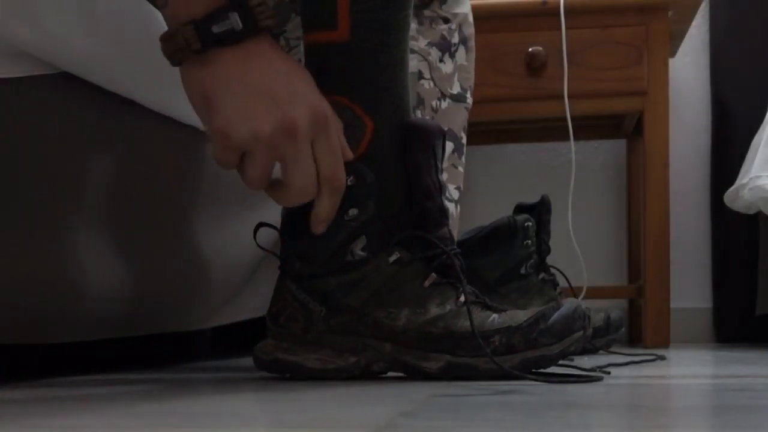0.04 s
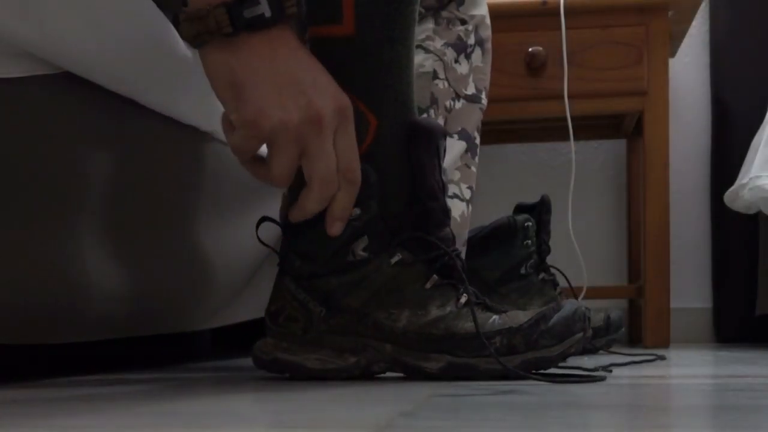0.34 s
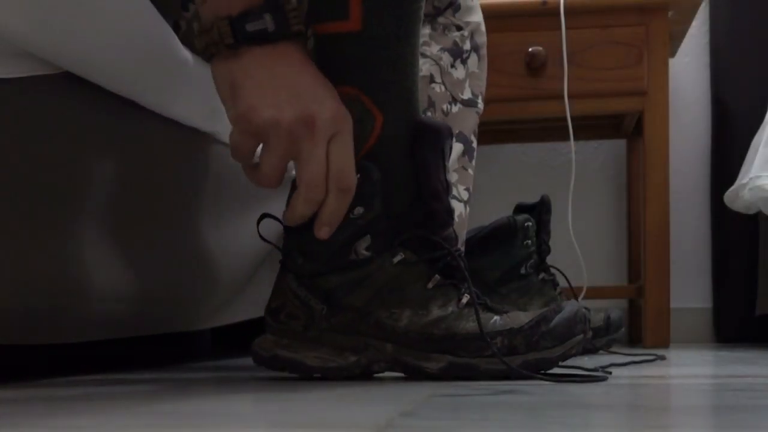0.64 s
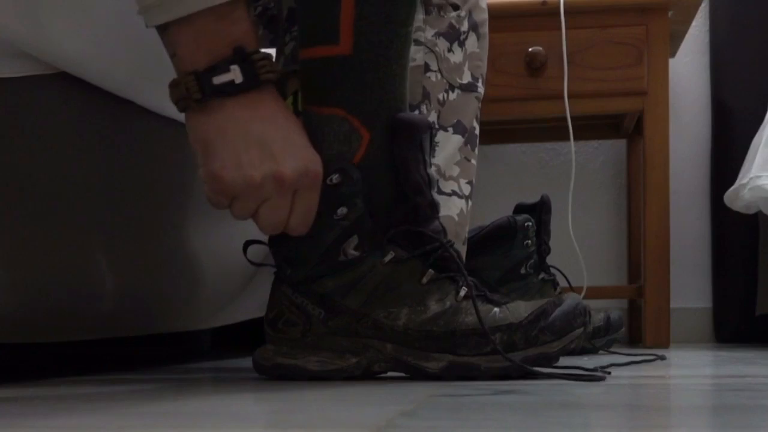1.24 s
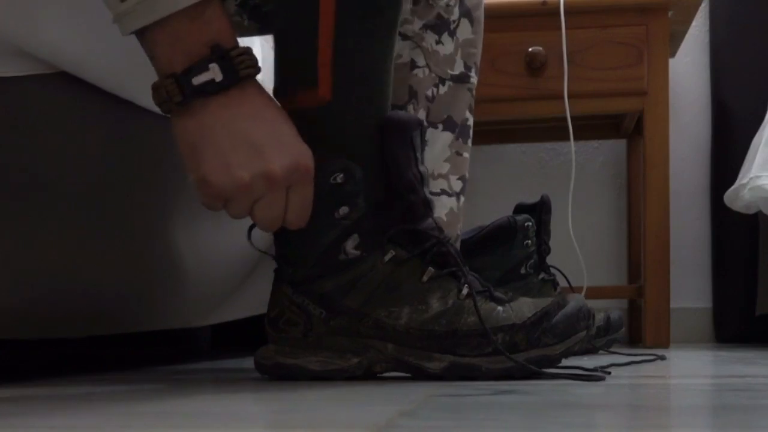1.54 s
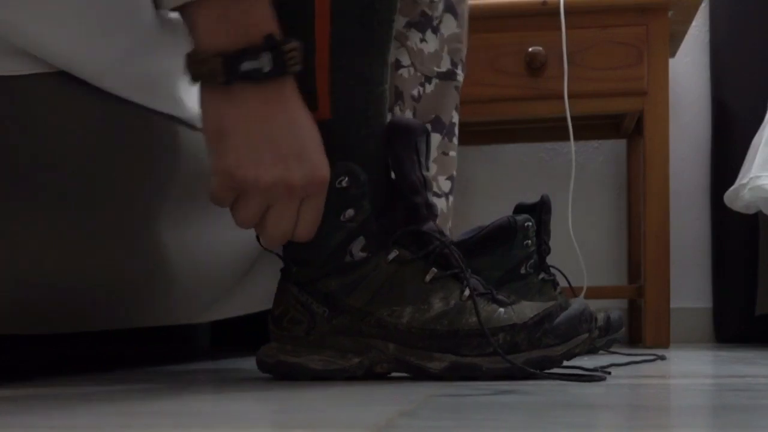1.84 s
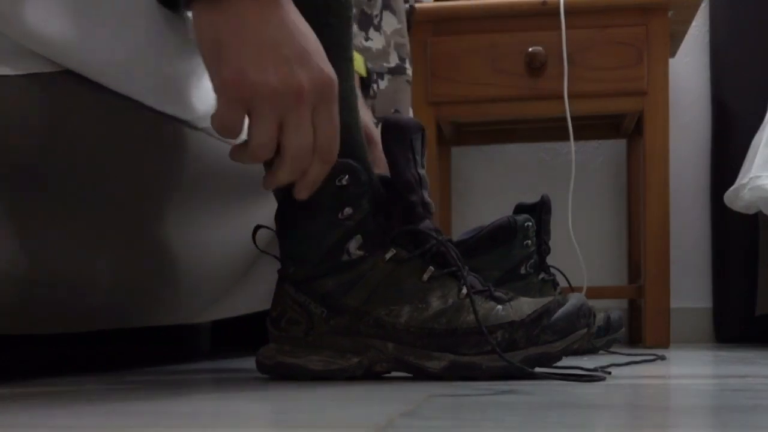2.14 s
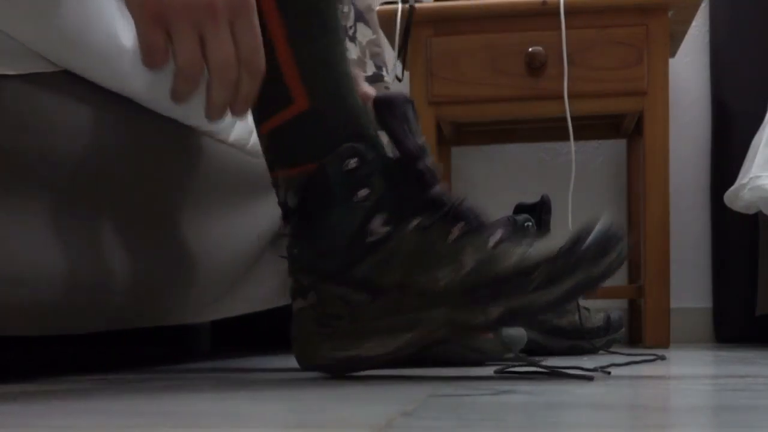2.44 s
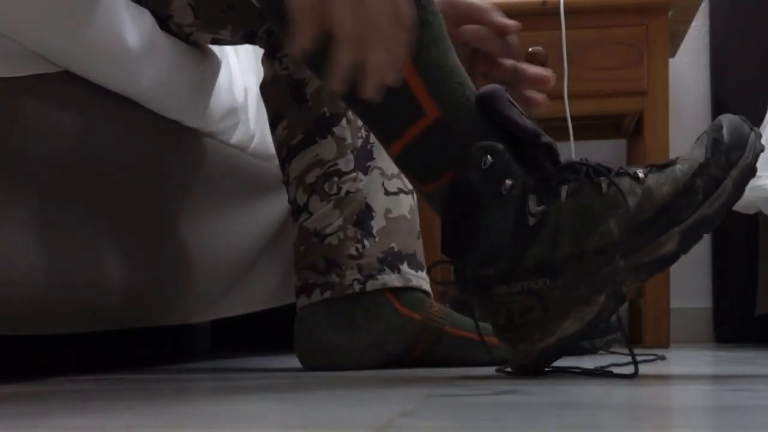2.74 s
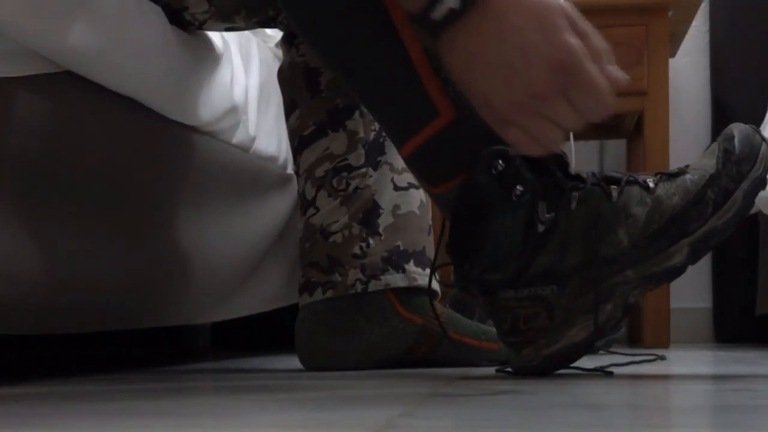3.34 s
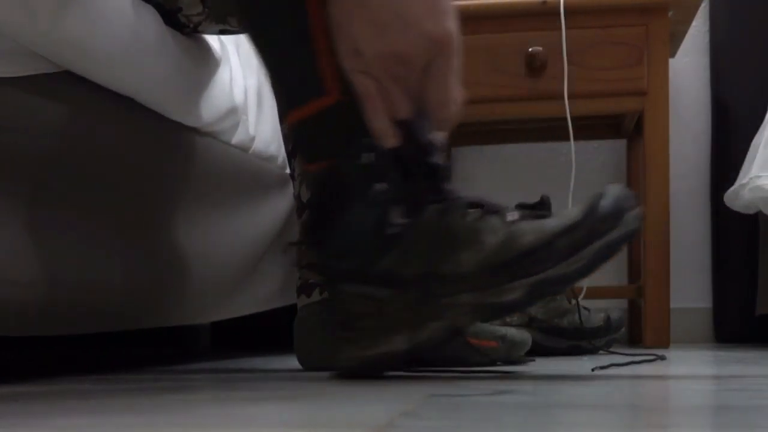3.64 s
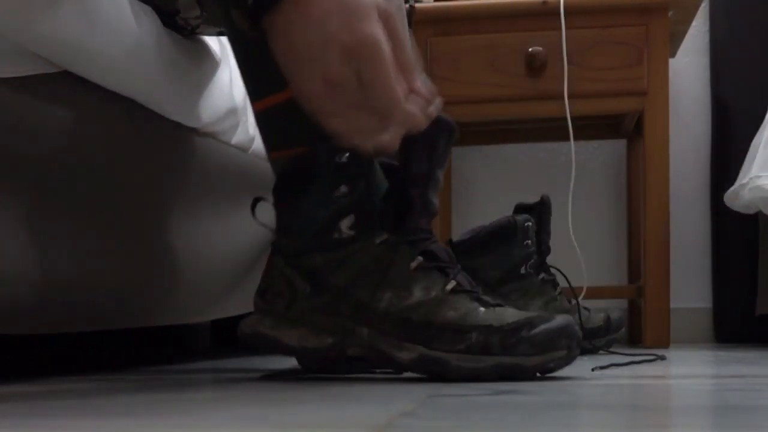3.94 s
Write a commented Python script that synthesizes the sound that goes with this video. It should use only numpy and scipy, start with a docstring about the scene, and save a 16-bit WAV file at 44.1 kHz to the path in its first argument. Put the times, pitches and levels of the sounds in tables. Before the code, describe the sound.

A boot is pulled on, heard close in a small bedroom, with soft clothing rustle and faint bumps throughout. At about 1.5 seconds the foot slides in with a swish, and the heel thuds home near 1.8. Trousers brush around 2.4. From 3 seconds come light taps and a brief hiss of a pulled lace. At 3.8 the sole smacks loudly on the hard floor, ringing briefly.

```python
"""A hiking boot is pulled on, handled and slapped down on the hard floor of a small bedroom.
Stick-slip friction of sock, trousers and hands makes the rustle; the foot slides in with a rush
and the heel thuds home. Impacts excite damped modes: dull thuds when padded, sharp taps when hard,
and a loud smack when the rubber sole lands flat. Floor and room ring on, and a close microphone
picks it all up over a faint hiss."""
import sys
import numpy as np
from scipy import signal
from scipy.fft import rfft, irfft
from scipy.io import wavfile

SR = 44100
rng = np.random.default_rng(int(sys.argv[2]) if len(sys.argv) > 2 else 0)


def pcm_store(signal):
    """Save signal as 16-bit PCM."""
    levels = np.round(np.clip(np.atleast_2d(signal), -1, 1) * 32767)
    wavfile.write(sys.argv[1], SR, levels.astype(np.int16).T)


N = 176400
T = np.arange(N) / SR
HZ = np.maximum(np.fft.rfftfreq(N, 1 / SR), 1)
SLAP_S, SLAP_DB = 3.8176, -4.5   # the blow that drives both sole and floor

# Likeness of left and right. Each row: frequency in Hz, correlation.
COHERENCE = [(180, .999), (500, 0.93), (1500, 0.84), (4000, 0.61), (8000, 0.61), (14000, 0.73)]
# First reflections. Each row: delay in seconds, gain in dB.
REFLECTIONS = [(.0049, -7.5), (0.0127, -20.5), (0.0134, -7.5), (.018, -10), (.044, -13)]
# Diffuse reverberation. Each row: frequency in Hz, T60 in seconds, gain in dB.
REVERBERATION = [(80, 0.67, 0.5), (208, 0.57, 4), (600, 0.29, 1.5), (1480, 0.34, 0), (3600, 0.49, -1),
                 (9400, 0.24, -0.5)]

# Damped modes. Each row: frequency in Hz, gain in dB, T60 in seconds.
WALL_MODES = [(84.2, -63, 0.92), (109.3, -56.5, 0.82), (169, -60.5, 1)]
FLOOR_MODES = [(111, -43.5, .6), (164, -36, .3), (277.4, -30, 0.42), (343.6, -38, 0.42), (529, -36.5, 0.52),
               (990, -32, 0.36), (1229, -23, 0.23), (1350, -26, .28), (1375, -30, 0.55), (1443, -28, 0.43),
               (1680, -29, 0.35), (1760, -27, .25), (1858, -25.5, 0.3), (1952, -24, 0.22)]
COLLAR_MODES = [(948, -20, 0.0038), (1900, -18.5, 0.0022), (2950, -18.5, 0.0031)]
SOLE_MODES = [(178, -22.5, .04), (325, -13.5, 0.012), (500, -17.5, .015), (970, -10.5, 0.0079),
              (1370, 0, 0.0077), (1820, -15.5, 0.015), (3760, -12, .004)]

# Noise spectra. Each row: frequency in Hz, relative spectral density in dB.
HISS_SPECTRUM = [(30, -20), (150, -6.5), (400, -4.5), (900, 1), (1500, 4.5), (4000, -6), (13000, -10),
                 (16000, -22)]
CLOTHES_SPECTRUM = [(300, -33), (1500, -8), (3000, 0), (6000, 0.5), (9000, -1.5), (12500, -1), (14500, -5),
                    (16000, -10.5)]
RUB_SPECTRUM = [(200, -40), (600, -21), (1000, -3), (1450, -0.5), (2100, -3), (2800, -5), (4000, -10),
                (7000, -32)]
HAND_SPECTRUM = [(50, -36), (160, -22.5), (300, -7.5), (450, -1), (620, -0.5), (800, 3), (1100, -4),
                 (1800, -20.5)]
LACE_SPECTRUM = [(400, -45), (1200, -39), (2200, 3), (4000, -24), (7000, -3.5), (10000, -1), (13000, -3),
                 (16000, -6)]
TROUSER_SPECTRUM = [(1000, -22), (1400, 0), (1700, 0), (2100, -15), (4200, -9), (4800, -1), (5600, -21),
                    (9000, -35)]
CHAFE_SPECTRUM = [(500, -40), (1150, -12), (1530, 5), (1900, -3), (2300, -7), (2750, 2.5), (3500, -28)]
SLIDE_SPECTRUM = [(90, -30), (220, -8.5), (450, -0.5), (850, -8), (1200, 3.5), (1800, 2), (2700, 0),
                  (4500, -6), (9000, -23)]
CAVITY_SPECTRUM = [(400, -27.5), (700, -2), (880, -1.5), (1100, -1), (1500, -11), (2500, -27)]
GRIT_SPECTRUM = [(1500, 2), (3500, 9.5), (6000, -1), (12000, -4.5), (16000, -16)]

# Envelopes of friction. Each row: time in seconds, relative level in dB.
CLOTHES_ENVELOPE = [(0.0, -57.5), (0.21, -62.5), (0.33, -56), (0.52, -71), (0.72, -60), (0.74, -54.5),
                    (0.97, -64), (1.08, -54), (1.27, -54), (1.46, -50.5), (1.55, -41.5), (1.66, -55.5),
                    (1.73, -61), (1.85, -48.5), (2.17, -60), (2.42, -54), (2.63, -63), (2.78, -63.5),
                    (2.81, -57.5), (2.89, -59), (2.92, -55), (3.31, -62.5), (3.33, -56.5), (3.49, -59),
                    (3.51, -54.5), (3.63, -51), (3.7, -53), (3.8, -49.5), (3.9, -67), (3.91, -65),
                    (4.0, -51)]
RUB_ENVELOPE = [(0.0, -58.5), (0.362, -59), (0.452, -68), (0.678, -78), (0.686, -59), (0.888, -60.5),
                (0.988, -68), (0.996, -62), (1.016, -59), (1.45, -51), (1.72, -66.5), (1.828, -47.5),
                (1.88, -49.5), (2.04, -55), (2.052, -59.5), (2.406, -56), (2.892, -64.5), (2.898, -64),
                (2.944, -57.5), (3.138, -53.5), (3.24, -60), (3.4, -56.5), (3.63, -54)]
HAND_ENVELOPE = [(0.0, -65), (0.19, -67.5), (0.51, -73), (0.92, -73), (1.05, -69), (1.45, -55), (1.65, -66),
                 (1.76, -67), (1.9, -56), (2.36, -60), (2.67, -71), (2.91, -62.5), (3.22, -53.5),
                 (3.34, -53.5), (3.48, -52.5), (3.72, -70), (3.79, -54)]

# Padded blows of foot and hand on the boot. Each row: start in seconds, impulse level in dB,
# pitch in Hz, bass frequency in Hz, relative bass level in dB.
THUDS = [(0.035, -40.5, 517, 110, -12), (.053, -54.5, 480, 246, 10.5), (0.2788, -36.5, 543, 207, 2),
         (0.997, -45.5, 373, 155, -10), (1.626, -49.5, 400, 160, 8), (1.68, -37.5, 352, 170, -29),
         (1.782, -36.5, 480, 200, -24), (1.8082, -28, 620, 180, -3), (1.834, -35, 283, 160, -11),
         (2.405, -41, 466, 171, -31), (2.561, -39, 300, 150, -16.5), (3.653, -39, 486, 203, -5.5)]
# Hard contacts of heel and laces. Each row: start in seconds, impulse level in dB, pitch in Hz,
# T60 in cycles, second resonance in Hz, its relative level in dB, left over right in dB.
TAPS = [(.995, -35, 1237, 9.7, 900, -13, 1), (3.033, -38, 800, 12.4, 517, -5, 0),
        (3.2677, -34, 1900, 5, 1007, 2, -1), (3.2762, -22, 1922, 7.8, 1210, -5.5, -2.5),
        (3.3265, -20.5, 1190, 11.8, 600, -11, -2), (3.547, -32.5, 2200, 11, 1200, -12, 0),
        (3.652, -18, 1086, 6.1, 500, -31, 6), (3.772, -32, 1000, 8.3, 2800, -3, 0),
        (3.8101, -23.5, 1100, 3.7, 2500, -10, 0)]


def from_db(db):
    """Amplitude grows tenfold for every 20 dB."""
    return 10 ** (np.asarray(db) / 20)


def unit_rms(x):
    """Division by the rms gives a signal unit power."""
    return x / np.sqrt(np.mean(x ** 2) + 1e-20)


def in_time(envelope):
    """Linear interpolation gives an envelope's level at every sample."""
    return np.interp(T, *np.transpose(envelope))


def at_hz(rows, hz):
    """Interpolation in log frequency gives each column of a table at hz."""
    frequencies, *columns = np.transpose(rows)
    return [np.interp(np.log(hz), np.log(frequencies), column) for column in columns]


def soften(x, hz):
    """A low-pass filter removes fast changes, as a soft contact does."""
    return signal.sosfilt(signal.butter(4, min(hz, .45 * SR), fs=SR, output="sos"), x + 1e-18)


def thin(x, hz):
    """A high-pass filter takes 12 dB per octave from the bass."""
    return signal.sosfilt(signal.butter(2, hz, "high", fs=SR, output="sos"), x)


def impulse(start_s, db=0):
    """An ideal impulse excites all frequencies equally."""
    return (np.arange(N) == int(start_s * SR)) * from_db(db)


def ring(x, hz, t60):
    """A damped resonator answers a unit impulse with a unit sine that falls 60 dB in t60 seconds."""
    decay = from_db(-60 / (t60 * SR))
    angle = 2 * np.pi * hz / SR
    return signal.lfilter([0, np.sin(angle)], [1, -2 * decay * np.cos(angle), decay ** 2], x + 1e-18)


def radiate(x, hz, t60):
    """A small vibrating patch radiates the derivative of its ringing, so little below its pitch."""
    return np.diff(ring(x, hz, t60), prepend=0) * SR / (2 * np.pi * hz)


def stereo(pair, gain):
    """Partial coherence: two independent noises mix into channels most alike in the bass."""
    alike = at_hz(COHERENCE, HZ)[0]
    mid, side = rfft(pair) * gain
    return irfft(np.sqrt(1 + alike) * mid + np.sqrt(1 - alike) * side * [[1], [-1]], N)


def hiss(level_db=-64):
    """The noise floor of room and microphone is steady, coloured Gaussian noise."""
    colour = from_db(at_hz(HISS_SPECTRUM, HZ)[0])
    return from_db(level_db) * unit_rms(stereo(rng.standard_normal((2, N)), colour))


def room_response(build_s=0.006):
    """Reflections from floor and furniture precede an exponential tail, longest in the bass."""
    noise = rfft(stereo(rng.standard_normal((2, N)), np.sqrt(.5)))
    edges = np.geomspace(25, SR / 2, 15)
    tail = 0
    for low, high in zip(edges, edges[1:]):
        t60, db = at_hz(REVERBERATION, np.sqrt(low * high))
        envelope = from_db(-60 * T / t60) * (1 - np.exp(-T / build_s))
        band = irfft(noise * (HZ >= low) * (HZ < high), N) * envelope
        energy_share = 2 * (high - low) / SR   # of a unit impulse, within this band
        tail = tail + from_db(db) * unit_rms(band) * np.sqrt(energy_share / N)
    early = sum(impulse(delay_s, db) for delay_s, db in REFLECTIONS)
    return (early + tail)[:, :SR]


def standing_waves(drive):
    """Sound reflected between the walls resonates at a few low frequencies."""
    return sum(from_db(db) * ring(drive, hz, t60) for hz, db, t60 in WALL_MODES)


def floor_ring():
    """Modes of floor and room, alternating in sign, decay freely after the slap."""
    blow = impulse(SLAP_S, SLAP_DB)
    return sum((-1) ** k * from_db(db) * ring(blow, hz, t60)
               for k, (hz, db, t60) in enumerate(FLOOR_MODES))


def friction(spectrum, level_db, slips_per_s=2500, spread_db=3, smooth_share=0.77, flutter_db=1.0):
    """Stick-slip friction: fibres catch and let go, as snaps in a smooth hiss under uneven pressure."""
    sizes = from_db(spread_db * np.minimum(rng.exponential(1, (2, N)), 5))
    signs = rng.choice([-1, 1], (2, N))
    slips = unit_rms(sizes * signs * (rng.random((2, N)) < slips_per_s / SR))
    fibres = np.sqrt(1 - smooth_share) * slips + np.sqrt(smooth_share) * rng.standard_normal((2, N))
    pressure_db = flutter_db * unit_rms(soften(rng.standard_normal(N), hz=22))
    coloured = stereo(fibres, from_db(at_hz(spectrum, HZ)[0]))
    return unit_rms(coloured) * from_db(level_db + pressure_db)


def swell(peak_s, width_s):
    """A Gaussian envelope rises smoothly to 1 and fades."""
    return np.exp(-.5 * ((T - peak_s) / width_s) ** 2)


def surge_db(peak_s, rise_db_per_s, fall_db_per_s):
    """Exponential growth and decay are straight lines in dB, meeting here at 0 dB."""
    return -np.maximum(rise_db_per_s * (peak_s - T), fall_db_per_s * (T - peak_s))


def rustle():
    """Friction in three registers: clothes in the treble, rubbing on the boot below, hands lowest."""
    clothes = friction(CLOTHES_SPECTRUM, in_time(CLOTHES_ENVELOPE) + 0.39)
    rubbing = friction(RUB_SPECTRUM, in_time(RUB_ENVELOPE) + 0.5)
    hands = friction(HAND_SPECTRUM, in_time(HAND_ENVELOPE) + 0.34)
    return clothes + rubbing + hands


def trouser_swish():
    """Friction of the trouser leg swells and fades as the leg is lifted."""
    return friction(TROUSER_SPECTRUM, level_db=-59.5) * swell(peak_s=2.4, width_s=0.22)


def lace_pull(start_s=3.503, end_s=3.66, ramp_s=.015):
    """Sliding friction gives a bright hiss while a lace is drawn out."""
    drawn = np.clip(np.minimum(T - start_s, end_s - T) / ramp_s + .5, 0, 1)
    return drawn * friction(LACE_SPECTRUM, level_db=-50)


def heel_chafe():
    """Friction of the settling heel on the lining sounds nasal through two resonances."""
    return friction(CHAFE_SPECTRUM, level_db=-44.5) * swell(peak_s=1.955, width_s=0.031)


def foot_slide():
    """Broadband friction surges as the foot slips past the collar."""
    return friction(SLIDE_SPECTRUM, -31.5 + surge_db(1.556, rise_db_per_s=208, fall_db_per_s=236))


def heel_entry(snap_s=1.554):
    """Cavity resonance colours a growing rush until the heel is past and the collar snaps back."""
    cavity = friction(CAVITY_SPECTRUM, -32.5 + surge_db(snap_s, rise_db_per_s=284, fall_db_per_s=550))
    collar = sum(from_db(db) * radiate(impulse(snap_s), hz, t60) for hz, db, t60 in COLLAR_MODES)
    return cavity + soften(collar, hz=6400)


def thuds(ring_cycles=9, bass_cycles=4.6):
    """Padded impacts excite two heavily damped modes of the boot and carry little treble."""
    out = 0
    for start_s, level_db, hz, bass_hz, bass_db in THUDS:
        blow = impulse(start_s, level_db)
        knock = radiate(blow, hz, ring_cycles / hz)
        bass = from_db(bass_db) * radiate(blow, bass_hz, bass_cycles / bass_hz)
        out = out + knock + bass
    return soften(out, hz=1150)


def taps(cutoff_ratio=1.31):
    """Hard impacts excite two modes each; the higher the modes, the crisper the tap."""
    out = 0
    for start_s, level_db, hz, cycles, second_hz, second_db, pan_db in TAPS:
        blow = impulse(start_s, level_db)
        first = radiate(blow, hz, cycles / hz)
        second = from_db(second_db) * radiate(blow, second_hz, cycles / second_hz)
        tap = soften(first + second, cutoff_ratio * max(hz, second_hz))
        out = out + tap * from_db([[pan_db / 2], [-pan_db / 2]])
    return thin(out, hz=400)   # small contacts radiate little bass


def sole_slap(grit_t60_s=0.057):
    """Impact on the floor excites the boot's damped modes in a hollow smack, and grit crunches."""
    blow = impulse(SLAP_S, SLAP_DB)
    body = sum(from_db(db) * radiate(blow, hz, t60) for hz, db, t60 in SOLE_MODES)
    grit_db = -31 - 60 * np.abs(T - SLAP_S) / grit_t60_s
    grit = (T >= SLAP_S) * friction(GRIT_SPECTRUM, grit_db)
    return (grit - soften(body, hz=3055)) * from_db([[-.5], [.5]])   # slightly to the right


def scene():
    """Superposition: direct sound, reverberation and lingering modes add over the noise floor."""
    slap, bumps = sole_slap(), thuds()
    rubbing = rustle() + foot_slide() + lace_pull() + heel_entry() + heel_chafe() + trouser_swish()
    # Each pair: source, gain into the room in dB.
    sources = [(rubbing, -9.5), (bumps, -2.5), (taps(), -4), (slap, -1.5)]
    direct = sum(sound for sound, _ in sources)
    into_room = sum(sound * from_db(db) for sound, db in sources).mean(axis=0, keepdims=True)
    reverberation = signal.fftconvolve(into_room, room_response(), axes=1)[:, :N]
    return hiss() + reverberation + standing_waves(bumps) + floor_ring() + direct


def record(dry, low_cut_hz=75, high_cut_hz=15800):
    """Band limiting: the microphone thins the deep bass, and a steep filter cuts the top."""
    low_pass = signal.ellip(12, .1, 80, high_cut_hz, fs=SR, output="sos")
    return signal.sosfilt(low_pass, thin(dry, low_cut_hz))


dry = scene()
out = record(dry)
pcm_store(out)
```